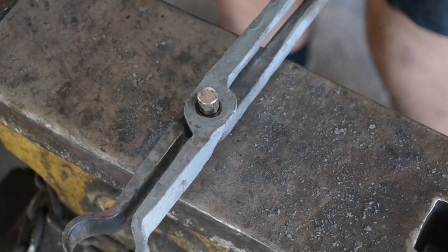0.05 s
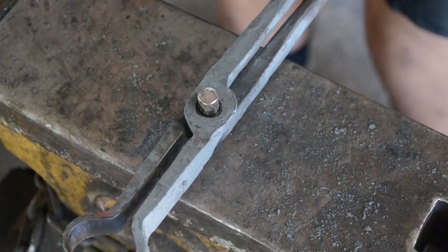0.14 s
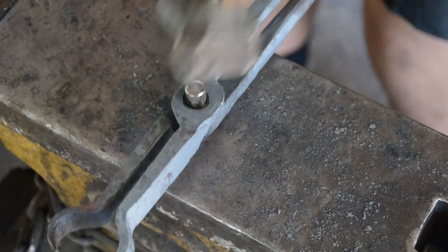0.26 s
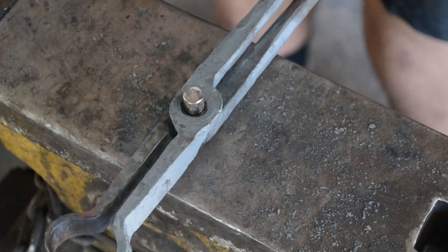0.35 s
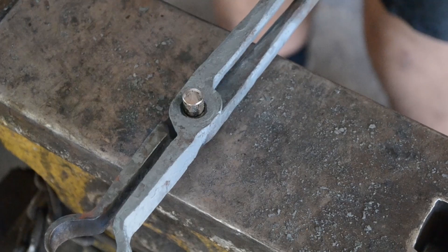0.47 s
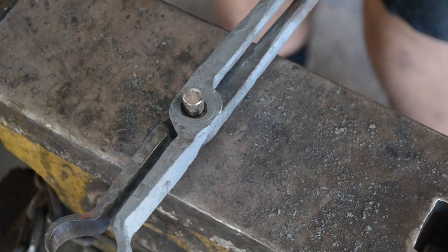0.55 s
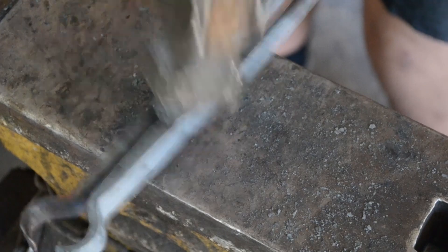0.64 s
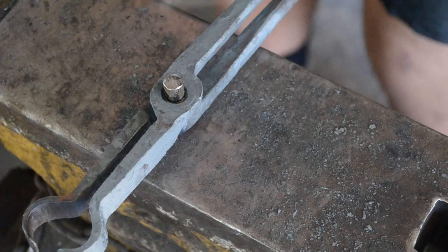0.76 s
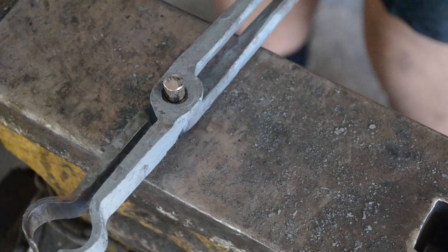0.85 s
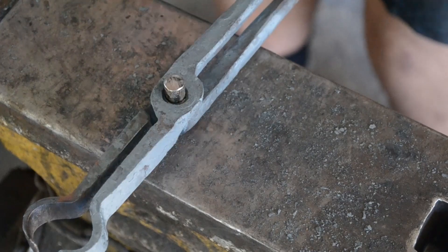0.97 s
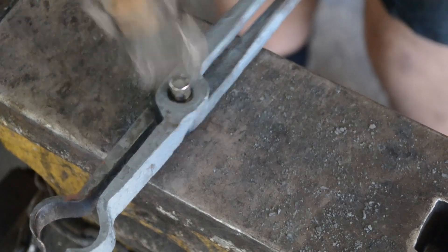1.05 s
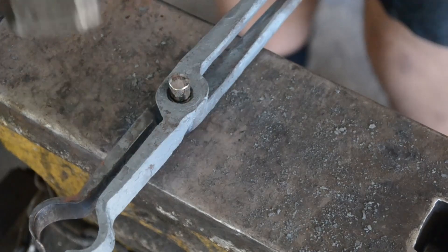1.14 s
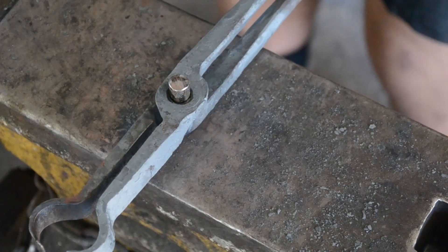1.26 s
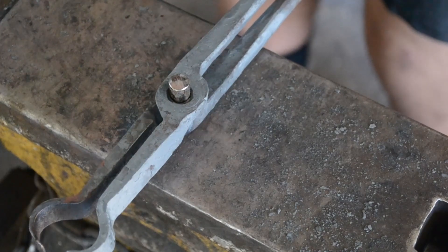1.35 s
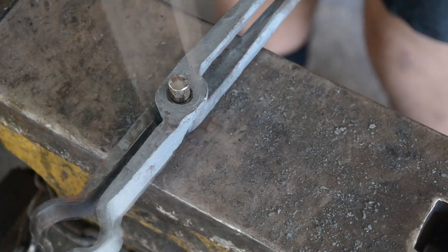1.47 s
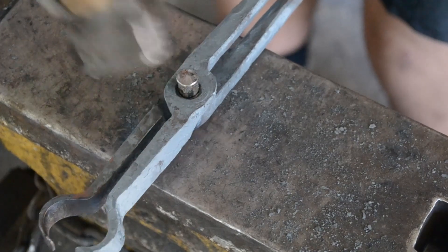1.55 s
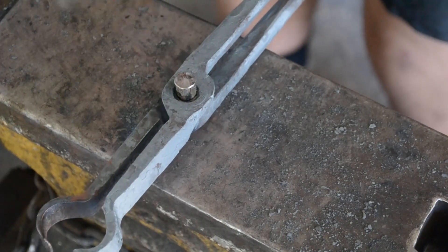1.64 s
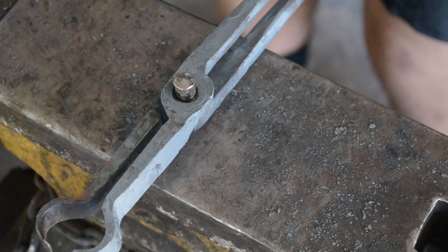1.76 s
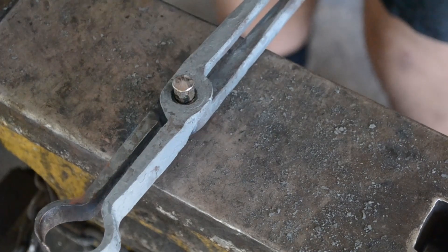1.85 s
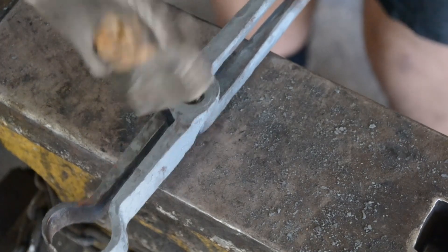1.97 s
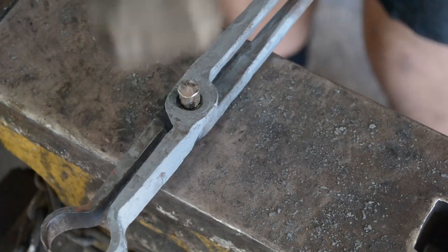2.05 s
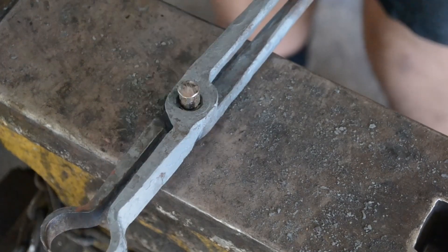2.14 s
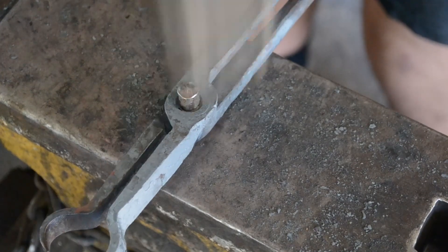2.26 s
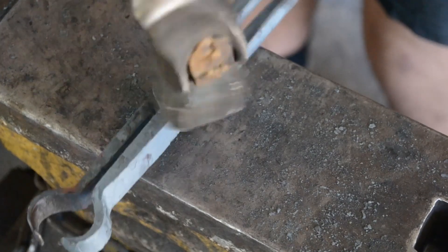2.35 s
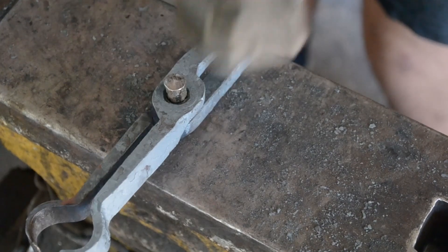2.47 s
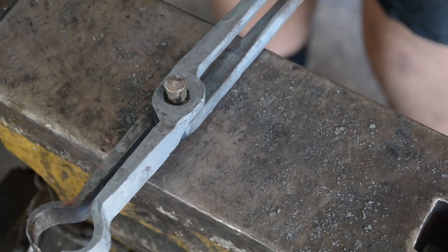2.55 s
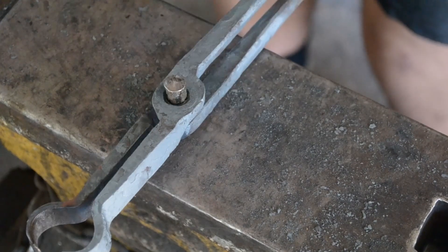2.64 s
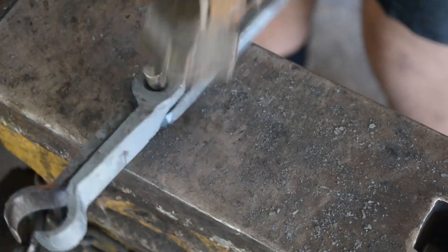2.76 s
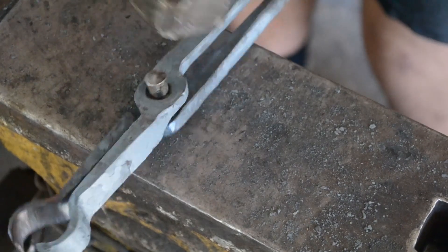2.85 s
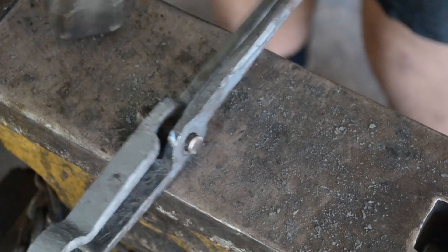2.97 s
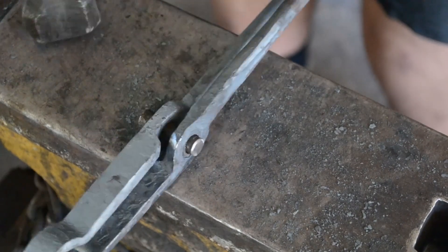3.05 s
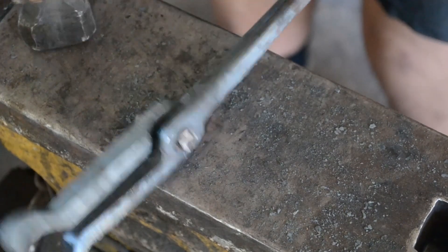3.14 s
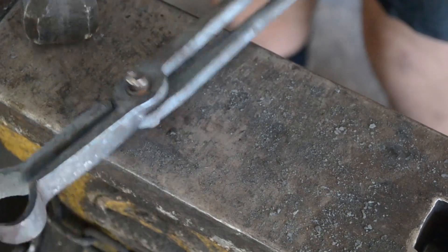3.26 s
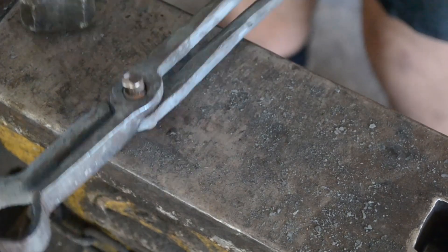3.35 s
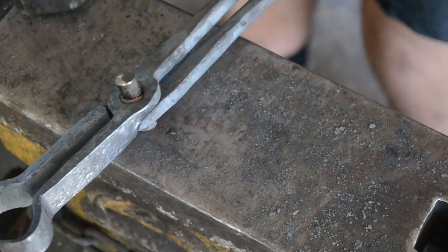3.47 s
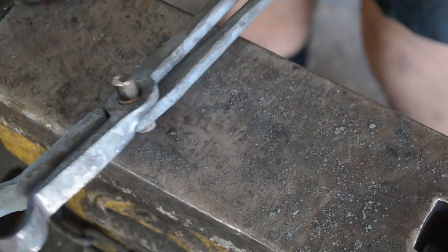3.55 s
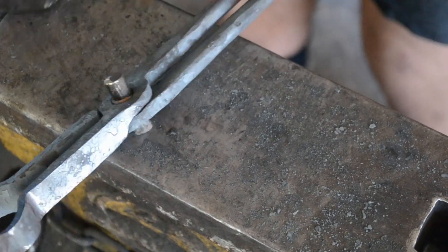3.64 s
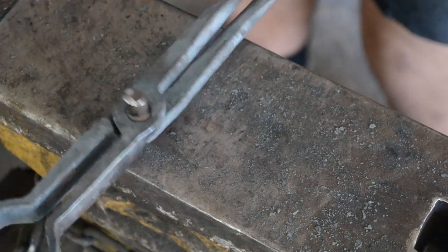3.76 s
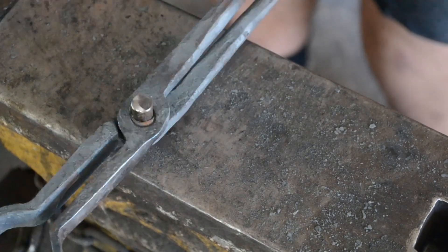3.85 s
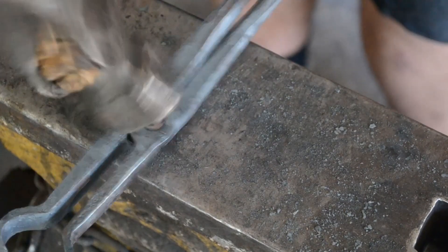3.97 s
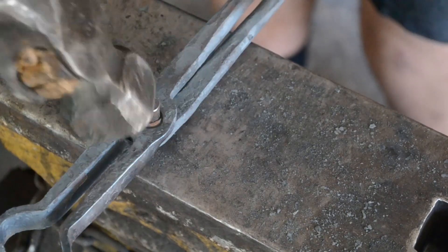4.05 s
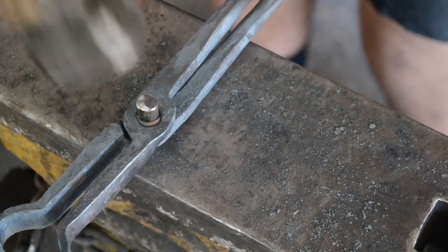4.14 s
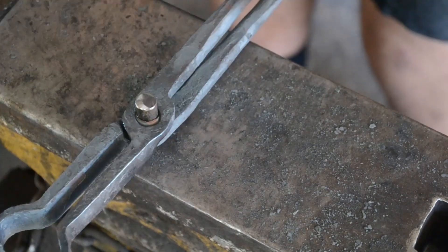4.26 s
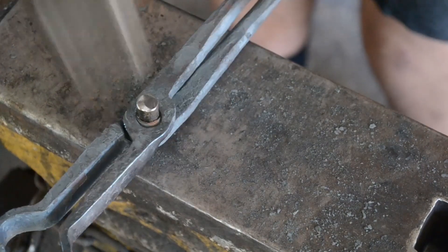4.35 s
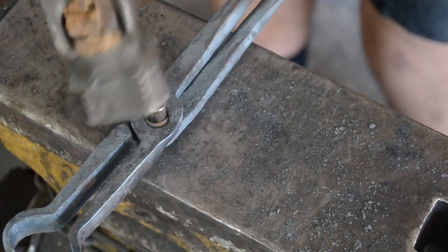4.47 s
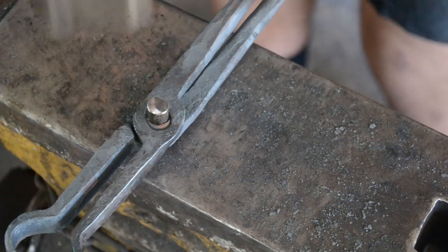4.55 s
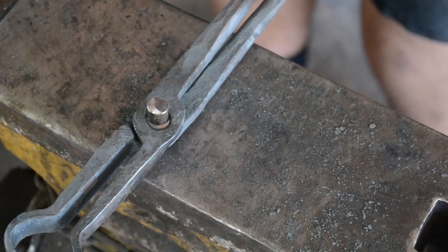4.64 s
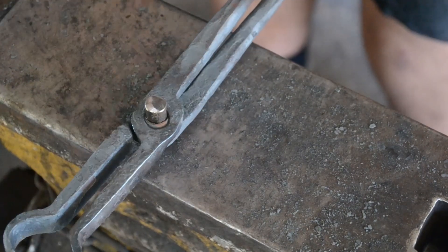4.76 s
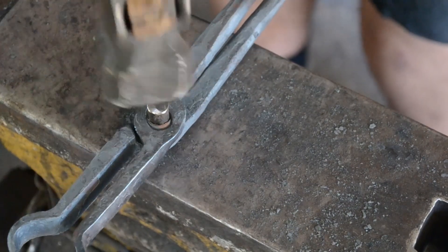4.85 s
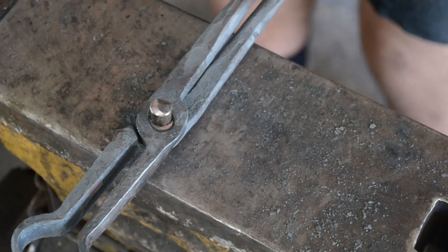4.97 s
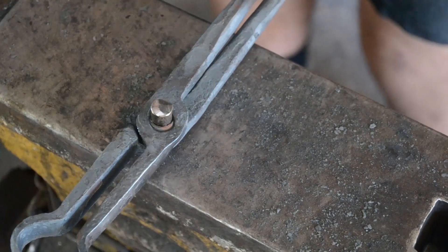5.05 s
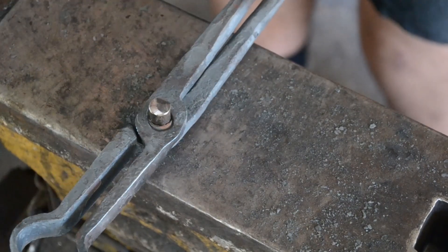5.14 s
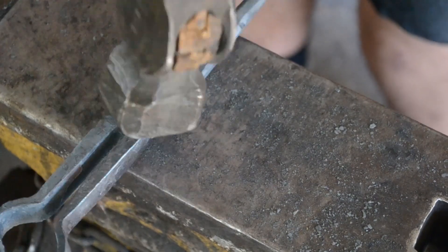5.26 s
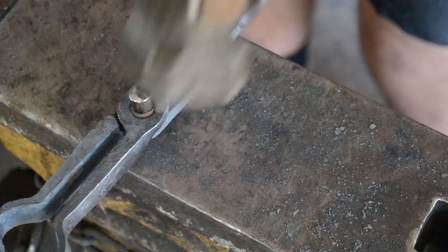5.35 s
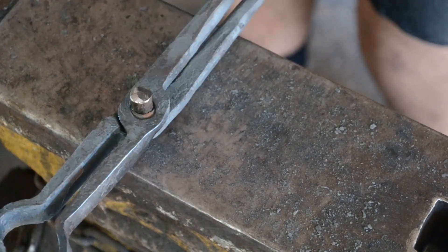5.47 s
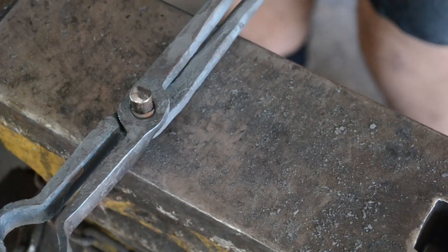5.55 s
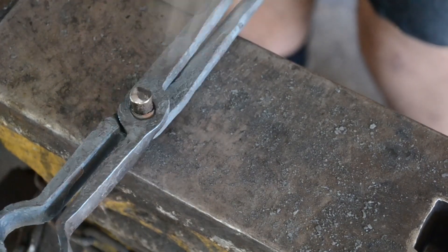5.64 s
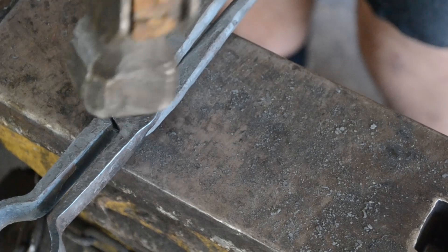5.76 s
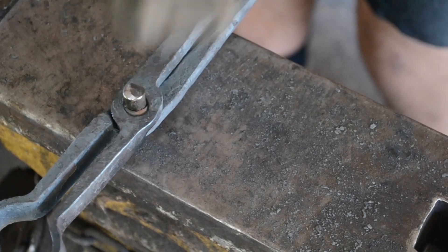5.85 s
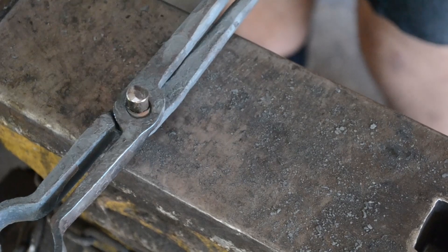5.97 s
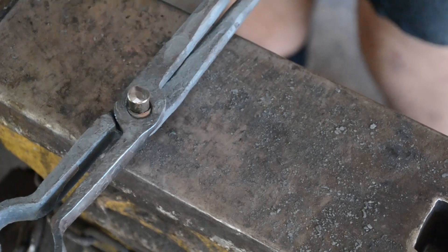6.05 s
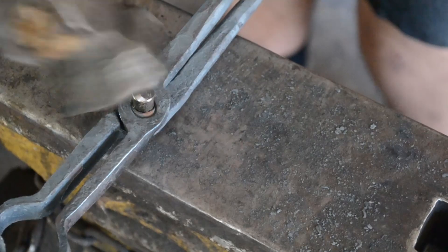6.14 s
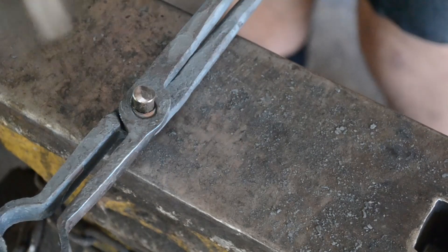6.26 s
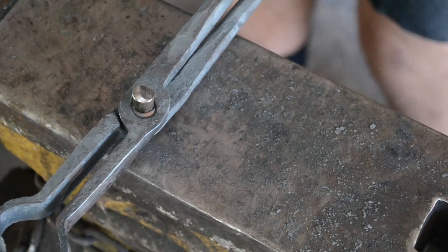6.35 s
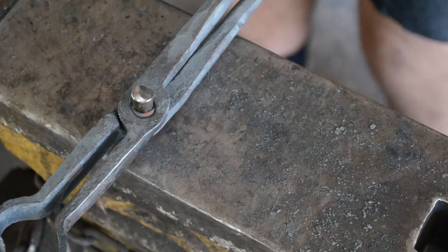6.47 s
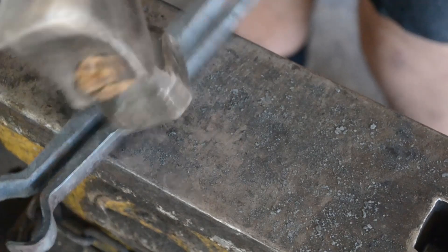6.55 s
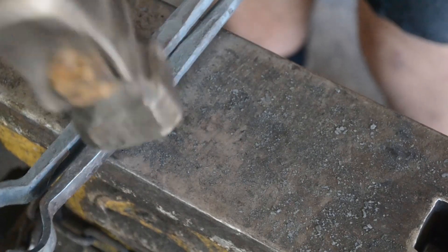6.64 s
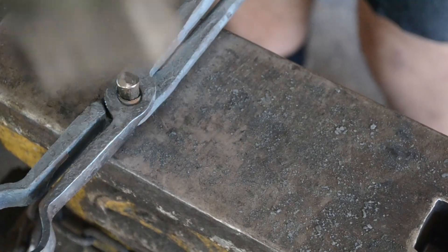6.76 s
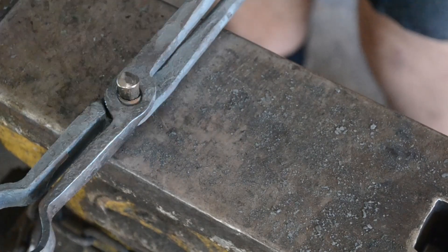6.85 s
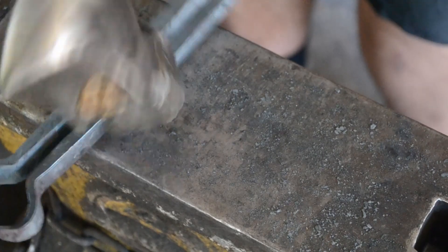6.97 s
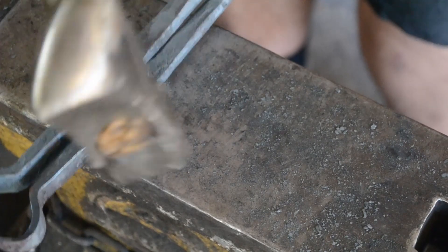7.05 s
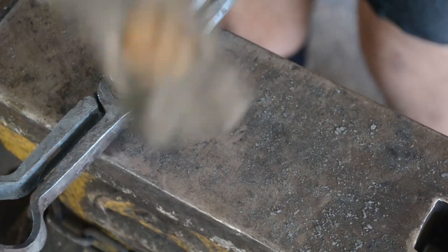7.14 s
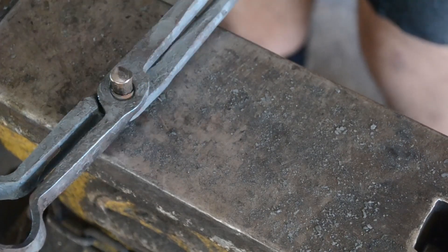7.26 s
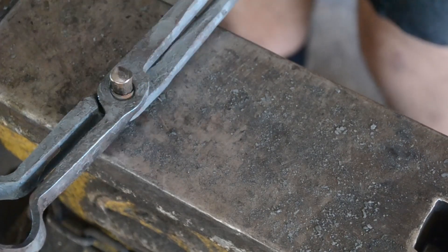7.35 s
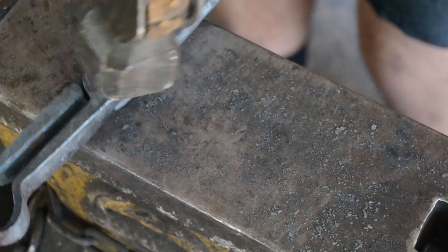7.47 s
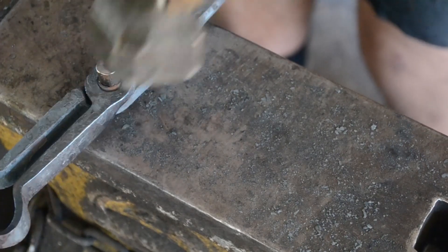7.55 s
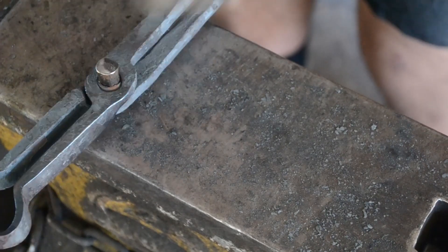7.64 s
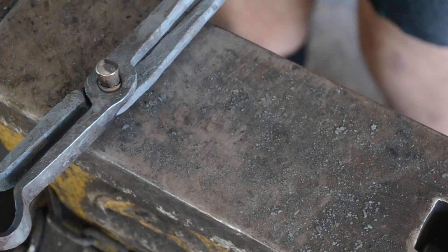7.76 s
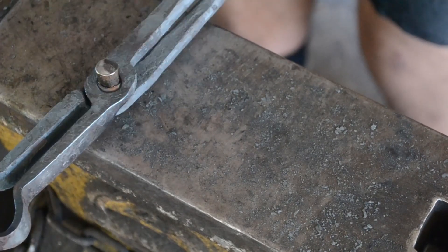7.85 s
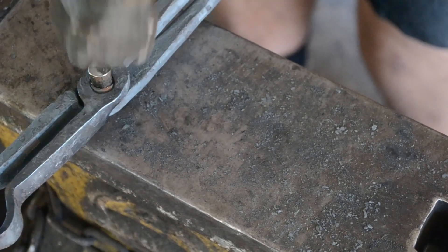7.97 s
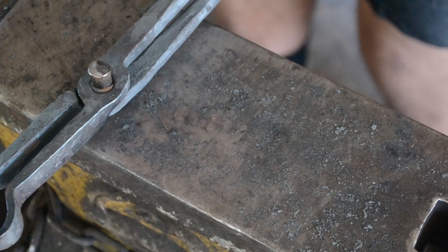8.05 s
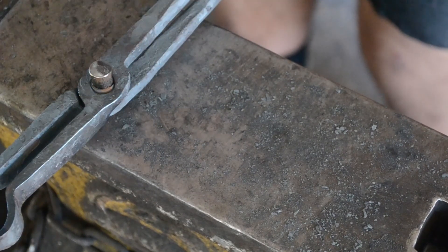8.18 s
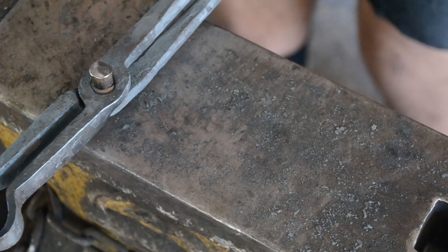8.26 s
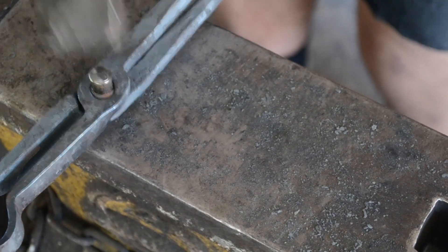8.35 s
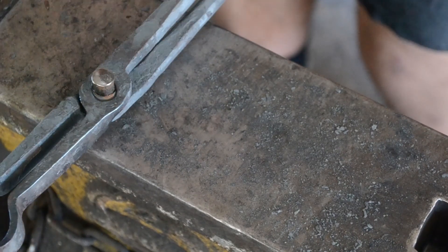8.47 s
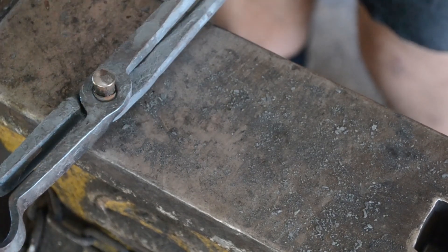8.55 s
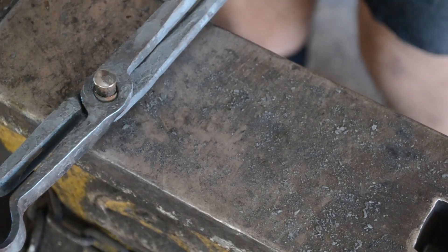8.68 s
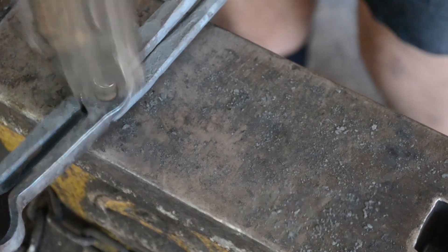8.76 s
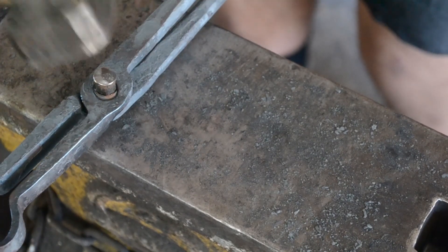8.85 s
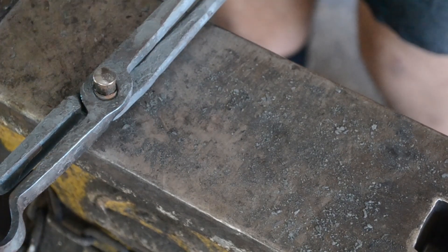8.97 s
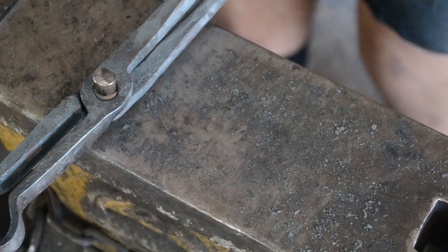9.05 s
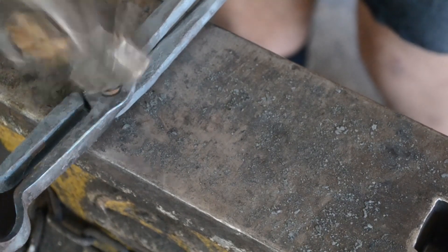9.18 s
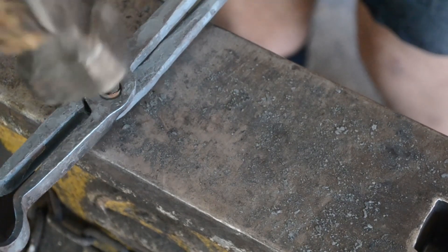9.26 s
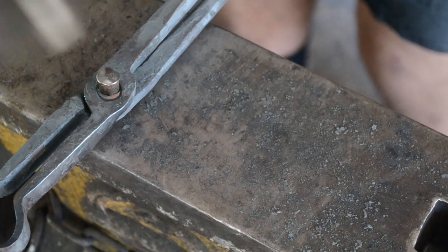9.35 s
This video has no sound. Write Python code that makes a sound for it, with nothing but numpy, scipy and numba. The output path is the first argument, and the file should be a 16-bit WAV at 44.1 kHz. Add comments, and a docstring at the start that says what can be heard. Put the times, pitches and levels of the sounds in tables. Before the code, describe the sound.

Over the steady hiss of a blower in a small workshop, seven even hammer blows crack and ring on a rivet against an anvil. The hammer lands on the anvil with a bounce, followed by clinks and a brief scrape of tongs. Hammering resumes lightly, then continues hard and regular. The hits sound close and a little distorted, with a short room tail, in the left channel only.

```python
"""A blower hisses steadily in a small workshop. From the start a hand hammer beats a rivet held in tongs
on an anvil: a crack, then ringing steel. The blows overload the recorder, whose gain control ducks and
lets the room tail swell back. At 3 s the hammer drops on the anvil and bounces, and the tongs clink and
scrape. At 4 s a second run of blows starts softly and builds to full force. Only the left channel sounds."""
import sys
import numpy as np
from scipy import signal
from scipy.fft import rfft, irfft
from scipy.io import wavfile
from scipy.ndimage import uniform_filter1d
from numba import njit

SR = 44100
rng = np.random.default_rng(int(sys.argv[2]) if len(sys.argv) > 2 else 0)


def to_wav(s):
    """Save 16-bit WAV."""
    ch = np.atleast_2d(s).T  # columns
    pcm = np.round(np.clip(ch, -1, 1) * 32767)  # PCM
    wavfile.write(sys.argv[1], SR, pcm.astype(np.int16))


N = 414980
LEAD, ONSET_DELAY_S = 22050, .0007  # pre-roll in samples; a short fixed delay before each sound starts
RING_T = np.arange(SR // 2) / SR

# blower hiss: f/Hz, relative level/dB
BLOWER_SPECTRUM = [(18, -58), (30, -44), (50, -23), (179, -2.5), (247, -14.5), (377, -6.5), (483, -9),
                   (1090, -3), (1180, -15), (1270, -4.5), (1750, -2.5), (2740, -6.5), (7960, -29),
                   (9010, -31), (11300, -44.5), (14600, -51), (22000, -120)]
# hammer blows: t/s, strength/dB, slant (0 square to 1 glancing), jaw chatter/dB, head ring/dB
HAMMER_BLOWS = [(-.225, 1, 0.85, -21, -22), (0.2041, -1.5, 0.071, -18, -20), (0.6359, -2, 0.14, -14, -26),
                (1.0714, -2.5, .1, -33, -28), (1.5024, -2, 0, -5, -21), (1.9084, -2, 1, -14, -21),
                (2.3268, -3, 0.62, -16, -25), (2.7388, -3.5, 0.33, -12, -23), (3.9996, -13.5, 0, -18, -32),
                (4.3925, -6, 0, -34, -24), (4.8081, -2, 0.64, -24, -36), (5.2359, -2.5, 0.79, -14, -19),
                (5.6755, -2.5, 0.97, -6.5, -31), (6.1352, -2.5, 0.11, -25, -23),
                (6.5478, -1.5, 0.42, -3, -34), (6.9843, -4, 0.97, -13, -21), (7.4236, -3, 0.7, -5.5, -28),
                (7.8874, -4, 1, -15, -16), (8.3361, -3, 0.14, -19, -11), (8.767, -3, 0.95, -20, -13),
                (9.1925, -2.5, 0.89, -4, -25)]
# steel-on-steel contact noise: f/Hz, relative level/dB
CRACK_SPECTRUM = [(59, -57), (100, -10.5), (604, -2), (1110, 0.5), (1900, 0.5), (3180, -4.5), (4630, -2.5),
                  (5210, -4), (7730, -12), (9810, -8), (11300, -27.5), (14600, -57), (22000, -120)]
# anvil, stand and nearest walls: f/Hz, level/dB, t60/s before damping, sign of the first swing
ANVIL_MODES = [(277.5, -23.0, 0.65, 1), (284.0, -21.0, 0.45, 1), (292.0, -24.0, 0.65, 1),
               (299.0, -21.0, 0.45, 1), (314.0, -10.0, 0.2, 1), (348.5, -14.0, 0.3, -1),
               (368.5, -9.0, 0.2, -1), (378.5, -29.0, 0.65, -1), (390.0, -19.0, 0.65, -1),
               (404.0, -16.0, 0.2, -1), (430.5, -25.0, 0.65, -1), (500.0, -22.0, 0.3, 1),
               (771.0, -24.0, 0.4, 1), (981.0, -24.0, 0.45, 1), (1696.5, -11.0, 0.45, -1),
               (1705.0, -13.0, 0.3, -1), (1710.5, -25.0, 0.65, 1), (1739.0, -24.0, 0.45, -1),
               (1752.5, -21.0, 0.45, -1), (1774.0, -19.0, 0.45, -1), (1781.5, -13.0, 0.45, -1),
               (1790.5, -19.0, 0.45, -1), (1797.0, -4.0, 0.3, -1), (1802.0, -11.0, 0.45, -1),
               (1807.0, -7.0, 0.45, 1), (1816.5, -14.0, 0.45, -1), (1829.0, -17.0, 0.2, -1),
               (1904.5, -19.0, 0.2, 1)]
# hammer head: f/Hz, level/dB, t60/s before damping
HEAD_MODES = [(4195, 0, .3)]
# tongs: f/Hz, level/dB, t60/s before damping
TONGS_MODES = [(3262, -6, .06), (3560, -8, .06), (3920, -6, .07), (4210, -6, .14), (4660, -10, .1),
               (5093, -3, .1), (5180, -4, .11), (5670, -3, .08), (6040, -6, .09), (6320, -5, .08),
               (6780, -11, .06), (7050, -12, .08), (7430, -6, .08), (8204, -10, .09), (8910, -6, .09),
               (9450, -11, .07), (9800, -9, .07), (11200, -14, .09)]
# tone of the room tail: f/Hz, relative level/dB
ROOM_SPECTRUM = [(60, -33), (150, -1.5), (240, -1.5), (350, -2.5), (700, -0.5), (1000, -4), (1400, -2),
                 (1850, 5), (2350, -1.75), (3000, -6), (6000, -7.5), (7900, -6), (9000, -7.5),
                 (11400, -5.5)]
# length of the room tail: f/Hz, t60/s
ROOM_DECAY = [(100, 0.61), (300, 0.77), (1000, 0.35), (3000, 0.49), (6000, 0.37), (11000, 0.26)]
# the dropped hammer lands and bounces: t/s, contact/dB, ring/dB
HAMMER_DROPS = [(3.0029, -16, -12.5), (3.0684, -19, -18.5)]
# bare anvil face: f/Hz, level/dB, t60/s
FACE_MODES = [(2116, 4, 0.017), (2330, -21, 0.058), (2800, -1.5, 0.028)]
# the tongs touch the anvil: t/s, strength/dB, weight on the anvil/dB, rivet rattle/dB
TONGS_CLINKS = [(3.1143, -18.5, -32, -24.5), (3.1924, -25.5, -51, -26), (3.4457, -21, -19, -45),
                (3.744, -52, -64, -52), (3.7986, -56, -68, -60), (4.2794, -51, -65, -52)]


def gain_of(db):
    return 10 ** (np.asarray(db) / 20)


def unit_rms(x):
    return x / np.sqrt(np.mean(x ** 2) + 1e-20)


def curve_at(points, hz):
    f, value = np.transpose(points)
    return np.interp(np.log(hz + 1), np.log(f + 1), value)


def add(bus, s, sound):
    part = bus[max(LEAD + round((s + ONSET_DELAY_S) * SR), 0):][:len(sound)]
    part += sound[:len(part)]


def coloured(x, spectrum, tilt_db=0):
    """EQs x to a spectrum, with tilt_db more per octave above 2 kHz."""
    hz = np.fft.rfftfreq(len(x), 1 / SR)
    octaves = np.log2(np.maximum(hz / 2000, 1))
    return irfft(rfft(x) * gain_of(curve_at(spectrum, hz) + tilt_db * octaves), len(x))


def modes(table, rise_s, damping_db_per_s=0):
    """Struck steel: one dying sine per row, choked by any added damping."""
    hz, db, t60 = np.transpose(table)[:3, :, None]
    decay = gain_of(db - (60 / t60 + damping_db_per_s) * RING_T)
    return decay * np.sin(2 * np.pi * hz * RING_T) * (1 - np.exp(-RING_T / rise_s))


def blower(level_db=-39.5, swell_db=.5):
    """A bed of broad air hiss that swells a little."""
    swell = unit_rms(uniform_filter1d(rng.standard_normal(N + LEAD), 4000))
    hiss = unit_rms(coloured(rng.standard_normal(N + LEAD), BLOWER_SPECTRUM))
    return gain_of(level_db + swell_db * swell) * hiss


def blow_levels(s, db, slant, jaws_db, head_db):
    """Balances one blow: slant brightens it and shifts energy from stand and rivet to the reins."""
    tilt_db = np.interp(slant, (0, 1), (-2, .34))
    stand_db = db + np.interp(slant, (0, 1), (7.5, 5))
    horn_db = db + np.interp(slant, (0, 1), (6, 8.5))
    reins_db = db + np.interp(slant, (0, 1), (-28, 7.5))
    rivet_db = db + np.interp(slant, (0, 1), (2, -55)) - 3 * s  # the rivet flattens and rings less
    return s, db, tilt_db, stand_db, horn_db, head_db, (reins_db, jaws_db, rivet_db)


def crack(noise, tilt_db, t60, rise_s):
    """Contact noise: a broad burst that rises and dies."""
    t = np.arange(len(noise)) / SR
    envelope = gain_of(-60 * t / t60) * (1 - np.exp(-(t / rise_s) ** 2))
    return coloured(noise, CRACK_SPECTRUM, tilt_db) / np.std(coloured(noise, CRACK_SPECTRUM)) * envelope


def anvil_rings():
    """The low ring of the stand and the high ring of the horn, with a little extra damping on every mode."""
    hz, sign = np.transpose(ANVIL_MODES)[[0, 3]]
    body = sign[:, None] * modes(ANVIL_MODES, rise_s=.0091, damping_db_per_s=28)
    return body[hz < 1200].sum(0), body[hz > 1200].sum(0)


def tongs_ring(parts_db, tongs_modes):
    """Reins, jaws and rivet each ring around their own pitch; the spot struck varies the balance."""
    parts_hz = (3500, 5500, 9000)
    modes_db = np.interp(np.transpose(TONGS_MODES)[0], parts_hz, parts_db)
    return gain_of(modes_db + 3 * rng.standard_normal(len(modes_db))) @ tongs_modes


def hammer_strikes(sharp, rings, strikes):
    """Each hit cracks and thumps, and sets tongs, anvil and hammer head ringing."""
    dull_noise = rng.standard_normal(1024)  # the dull part of the contact repeats from hit to hit
    t = np.arange(400) / SR
    thump = -np.sin(2 * np.pi * 1200 * t) * gain_of(-60 * t / .011)  # air pushed aside by the hammer
    bass = gain_of(-23) * np.hanning(len(t))  # a short, deep bass thump under each hit
    stand, horn = anvil_rings()
    head = modes(HEAD_MODES, rise_s=.00062)[0]
    pressed_tongs = modes(TONGS_MODES, rise_s=.000059, damping_db_per_s=350)
    for s, db, tilt_db, stand_db, horn_db, head_db, parts_db in strikes:
        dull = crack(dull_noise, tilt_db - 9, t60=.015, rise_s=.002)
        bright = crack(rng.standard_normal(1024), tilt_db + 2.5, t60=.017, rise_s=.0018)
        add(sharp, s, gain_of(db + 17) * dull + gain_of(db + 15) * bright)
        add(sharp, s, gain_of(db + 16) * thump)
        add(sharp, s, tongs_ring(parts_db, pressed_tongs))
        add(rings, s, gain_of(stand_db) * bass)
        add(rings, s, gain_of(stand_db) * stand + gain_of(horn_db) * horn + gain_of(head_db) * head)


def room(x):
    """Workshop tail: dense echoes of random sign, each band dying at its own speed."""
    taps = np.zeros(SR)
    slots = np.arange(180, SR - 10, 10)
    taps[slots + rng.integers(0, 10, len(slots))] = rng.choice([-1., 1.], len(slots))
    hz, t, bands = signal.stft(taps, SR, nperseg=512)
    bands_db = curve_at(ROOM_SPECTRUM, hz)[:, None] - 60 * t / curve_at(ROOM_DECAY, hz)[:, None]
    tail = signal.istft(bands * gain_of(bands_db), SR, nperseg=512)[1]
    return signal.fftconvolve(x, tail / np.linalg.norm(tail))[:len(x)]


@njit
def follow(over_db, attack, release):
    out, state = np.empty_like(over_db), 0.
    for i in range(len(over_db)):
        state += (attack if over_db[i] > state else release) * (over_db[i] - state)
        out[i] = state
    return out


def gain_control(x, threshold_db=-13.5, depth=.73, attack_s=.0091, release_s=.029):
    """Ducks loud hits within milliseconds and recovers more slowly."""
    power = signal.lfilter([.01], [1, -.99], x ** 2)
    over_db = np.maximum(10 * np.log10(power + 1e-12) - threshold_db, 0)
    return x / gain_of(depth * follow(over_db, 1 / (attack_s * SR), 1 / (release_s * SR)))


def drop_levels(s, db, ring_db):
    """Balances one landing of the dropped hammer, which shakes anvil, head and tongs."""
    tilt_db = -1.6
    stand_db, horn_db, head_db = ring_db + 3.5, ring_db + 4, ring_db + .5
    return s, db, tilt_db, stand_db, horn_db, head_db, ring_db + np.array([7, -4, -24])


def face_pings(sharp):
    """The bare anvil face pings briefly under the dropped hammer."""
    for s, _, ring_db in HAMMER_DROPS:
        add(sharp, s, gain_of(ring_db + 9) * modes(FACE_MODES, rise_s=.00041).sum(0))


def tongs_clinks(sharp, rings):
    """Light touches tick and ring the tongs; the anvil and the hammer lying on it ring along."""
    stand, horn = anvil_rings()
    hand_held_tongs = modes(TONGS_MODES, rise_s=.00033, damping_db_per_s=150)
    resting_head = modes(HEAD_MODES, rise_s=.001, damping_db_per_s=200)[0]
    anvil = stand + gain_of(-10) * horn + gain_of(-6) * resting_head
    for s, db, weight_db, rivet_db in TONGS_CLINKS:
        add(sharp, s, tongs_ring((db - 6, db, rivet_db), hand_held_tongs))
        tick = crack(rng.standard_normal(1024), tilt_db=.92, t60=.042, rise_s=.00055)
        add(sharp, s, gain_of(db - .5) * tick)
        add(rings, s, gain_of(weight_db) * anvil)


def tongs_scrape(sharp, rings, s=3.345, swell_s=.028):
    """The tongs slide over the anvil's edge: a bright hiss over a soft-edged ring of the stand."""
    hiss = crack(rng.standard_normal(8192), tilt_db=2.8, t60=.51, rise_s=.029)
    stand, _ = anvil_rings()
    add(sharp, s, gain_of(-40.5) * hiss)
    add(rings, s, gain_of(-17) * stand * np.minimum(RING_T / swell_s, 1))


def scene():
    """Two buses over the hiss: sharp attacks with plenty of room, long rings nearly dry."""
    sharp, rings = np.zeros((2, N + LEAD))
    blows = [blow_levels(*blow) for blow in HAMMER_BLOWS]
    drops = [drop_levels(*drop) for drop in HAMMER_DROPS]
    hammer_strikes(sharp, rings, blows + drops)
    face_pings(sharp)
    tongs_clinks(sharp, rings)
    tongs_scrape(sharp, rings)
    reverb = gain_of(-5.5) * room(sharp) + gain_of(-30.5) * room(rings)
    left = sharp + rings + reverb + blower()
    return np.array([left, 0 * left])[:, LEAD:]


def record(dry):
    """Gain control, an overdriven preamp and its band limit, a hard clip, the recorder's band limit."""
    ducked, knee = gain_control(dry[0]), 8.
    squashed = 1.186 * ducked / (1 + abs(ducked / .83) ** knee) ** (1 / knee)
    preamp_lowpass = signal.ellip(10, .5, 95, 11400, fs=SR, output="sos")
    clipped = np.clip(signal.sosfilt(preamp_lowpass, squashed), -.99, .99)
    recorder_lowpass = signal.firwin(255, 15700, window=("kaiser", 6), fs=SR)
    left = signal.oaconvolve(clipped, recorder_lowpass, "same")
    return np.array([left, 0 * left])


dry = scene()
out = record(dry)
to_wav(out)
```